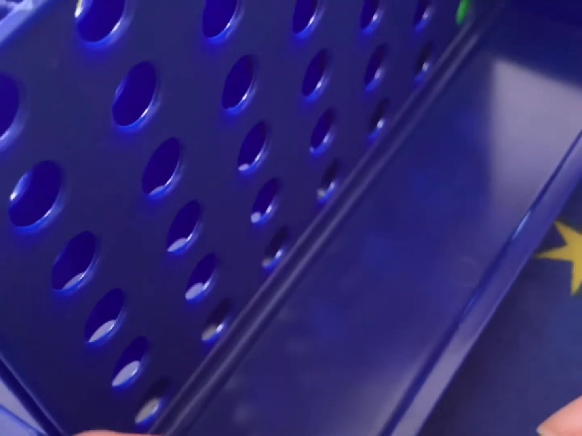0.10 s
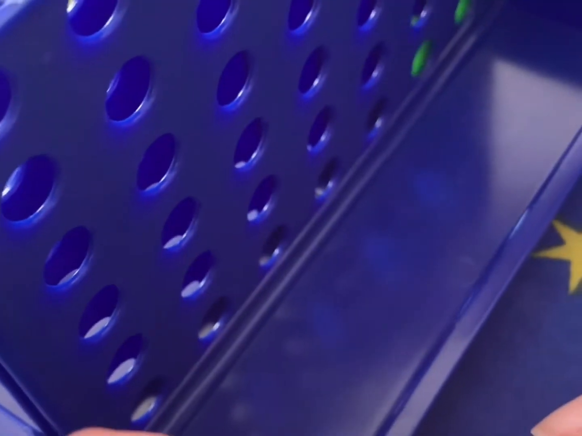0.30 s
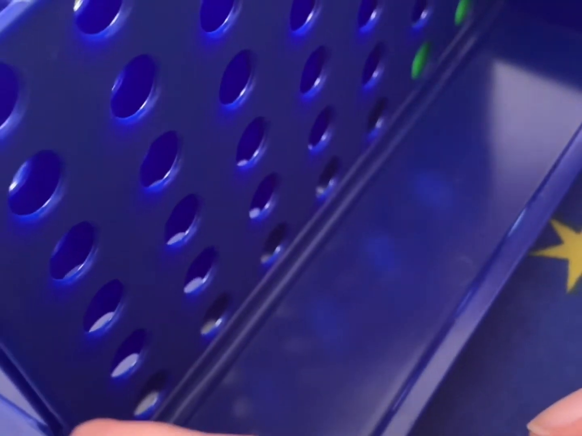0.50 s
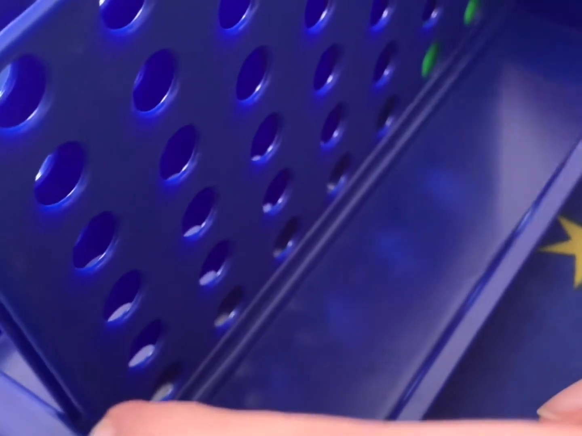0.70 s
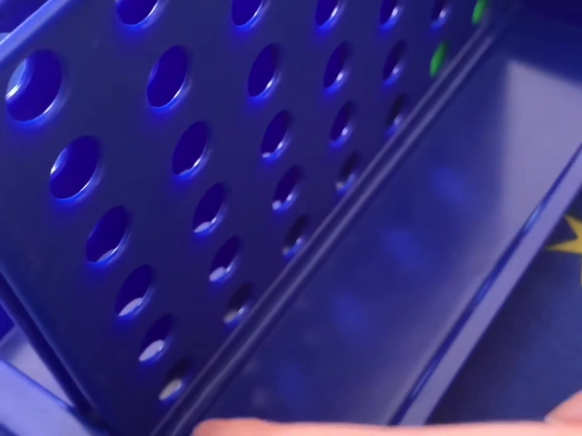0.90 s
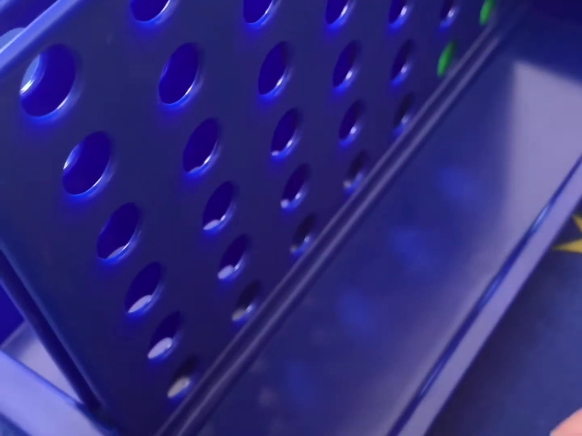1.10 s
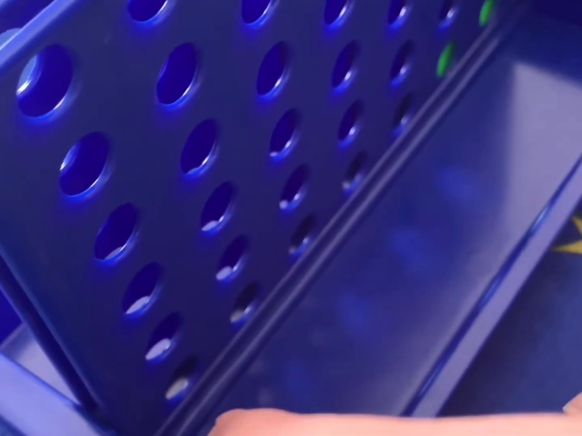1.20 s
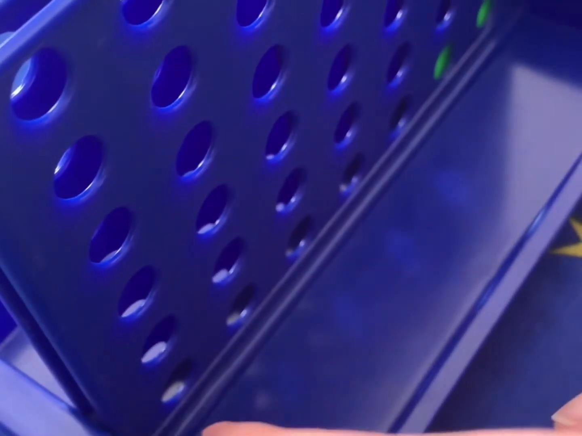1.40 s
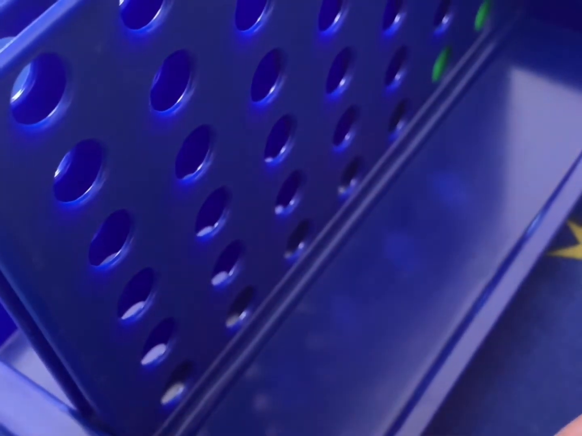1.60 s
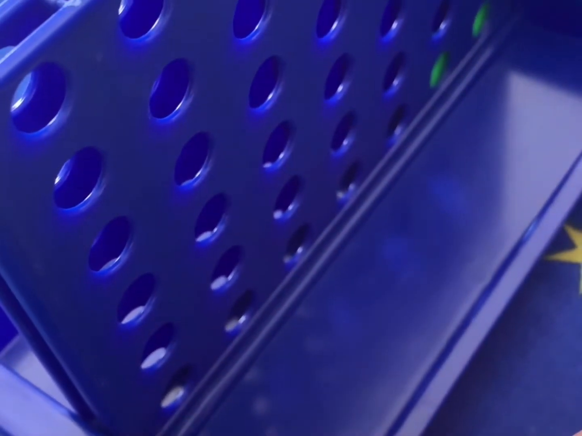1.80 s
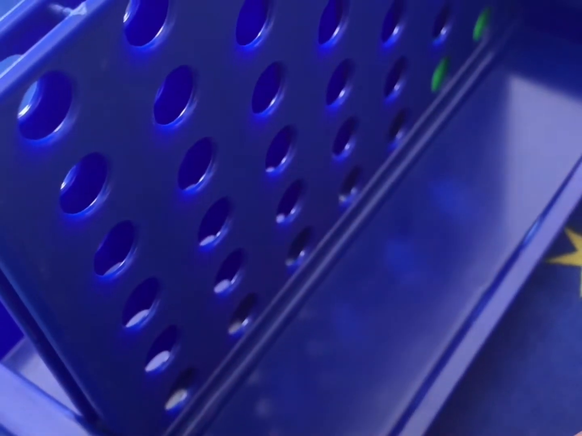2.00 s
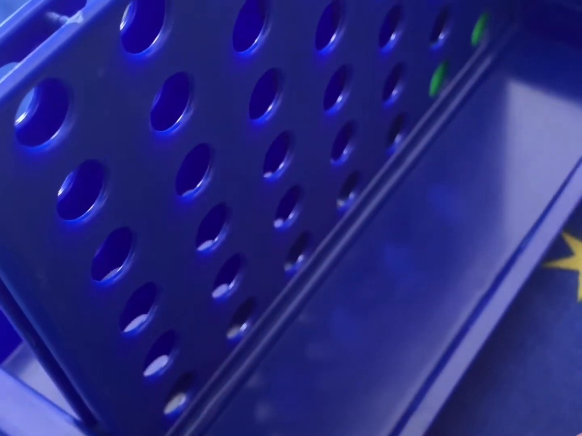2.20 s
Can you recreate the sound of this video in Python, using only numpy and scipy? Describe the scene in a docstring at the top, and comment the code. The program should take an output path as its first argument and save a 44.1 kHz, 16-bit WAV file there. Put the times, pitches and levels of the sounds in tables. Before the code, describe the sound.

Plastic game disc drops into an upright grid with sharp bouncing clacks, then loose discs tick lightly.

```python
"""A plastic disc rattles down a slot of an upright plastic grid, lands and bounces; later fingers shift loose
discs, which tick and ping thinly over a quiet rumbling room. Contacts are noise bursts and decaying modes, rubbing
is resonant noise, knocks and bumps are damped low notes, a faint squeak is a sagging tone, and the room is shaped
noise. The recorder's processing shifts phase between the channels, the right lagging further towards the treble."""
import sys
import numpy as np
from scipy import signal
from scipy.fft import rfft, irfft, next_fast_len
from scipy.io import wavfile
from scipy.ndimage import map_coordinates

SR = 44100
rng = np.random.default_rng(int(sys.argv[2]) if len(sys.argv) > 2 else 0)


def materialize(psi):
    """Save the field psi as 16-bit PCM at rate SR to the path in sys.argv[1].

    A 1-D psi becomes a single channel; in a 2-D psi each row is a channel.
    """
    bounded = np.clip(np.atleast_2d(psi).T, -1, 1)
    quanta = np.round(bounded * 32767).astype(np.int16)
    wavfile.write(sys.argv[1], SR, quanta)


def gain_from_db(level_db):
    """Turn a decibel level (scalar or array-like) into a linear amplitude factor."""
    decades = np.asarray(level_db, float) / 20
    return 10 ** decades


N = 97020  # samples, 2.2 s

# vibration modes of the plastic grid: mode_hz, relative_level_db, nominal_t60_s
GRID_MODES = [(1758, -6, 0.085), (1887, -5, 0.075), (2445, -12, .08), (2600, -3, 0.065), (2945, -6, 0.07),
              (3420, -10, 0.075), (3797, -4, 0.055), (5740, -7, .04), (5960, 0, 0.035), (6090, 0, .04),
              (6743, -9, 0.05)]
# vibration modes of the disc: mode_hz, relative_level_db, nominal_t60_s
DISC_MODES = [(1690, -17, .05), (3545, -6, .05), (7140, -4, .035), (7330, -13, .03), (8200, -5, .012),
              (9600, -9, .012), (10400, -10, .015)]
CONTACT_LOW_HZ = 912  # bass corner of the contact sounds


def unit(x):
    """Power normalisation: scaled to rms 1."""
    return x / np.sqrt(np.mean(x ** 2) + 1e-20)


def along(points, hz):
    """Spectral interpolation: (Hz, value) points read on a log frequency axis."""
    f, v = np.transpose(points)
    return np.interp(np.log(hz + 1), np.log(f + 1), v)


def level(rows):
    """Amplitude envelope: gain per sample from (s, dB) rows, all but silent outside them."""
    s, db = np.transpose(rows)
    return gain_from_db(np.interp(np.arange(N) / SR, s, db, left=-150, right=-150))


def wobble(rate):
    """Slow random modulation: a smooth curve through rate random knots a second."""
    knots = rng.standard_normal(int(N * rate / SR) + 4)
    return map_coordinates(knots, [np.arange(N) * rate / SR])


def filtered(x, response):
    """Linear filtering: the spectrum of x times a complex response of frequency."""
    n = x.shape[-1]
    m = next_fast_len(n + 8192)
    return irfft(rfft(x, m) * response(np.fft.rfftfreq(m, 1 / SR)), m)[..., :n]


def highpass(x, corner_hz):
    """Two equal first-order high-pass stages: 12 dB per octave well below the corner."""
    return filtered(x, lambda hz: (1j * hz / (corner_hz + 1j * hz)) ** 2)


def noise(colour, size):
    """Spectral shaping: coloured noise of rms 1."""
    white = rng.standard_normal(size)
    return unit(filtered(white, lambda hz: gain_from_db(along(colour, hz))))


def dying(t, t60, rise=.00013):
    """Damped free vibration: a quick rise (s), then an exponential fall of 60 dB in t60."""
    return gain_from_db(-60 * t / max(t60, .001)) * (1 - np.exp(-t / rise))


def tone(hz, t, t60):
    """Two-stage modal decay: a rough sine falls fast at first, then lingers; phase and level are random."""
    wander = .024 * np.cumsum(rng.standard_normal(len(t)))  # radians
    fade = dying(t, t60 * .3) + gain_from_db(-8) * dying(t, t60)
    scatter = gain_from_db(1.5 * rng.standard_normal())
    return scatter * fade * np.sin(2 * np.pi * (hz * t + rng.random()) + wander)


def burst(envelope, colour, tilt_db):
    """Impact noise: enveloped, then coloured and tilted towards the bass, with the envelope's energy."""
    raw = np.pad(envelope * rng.standard_normal(len(envelope)), (16, 0))
    x = filtered(raw, lambda hz: gain_from_db(along(colour, hz) - tilt_db * np.log2(hz + 300)))
    return (x * np.linalg.norm(envelope) / np.linalg.norm(x))[16:]


def add_at(out, start_s, sound):
    """Superposition: adds a sound to out from its start time."""
    out[round(start_s * SR):][:len(sound)] += sound


def rumble():
    """Low-frequency noise: a lumpy rumble common to both channels, with a weak opposed part."""
    # rumble envelope: time_s, level_db
    rumble_level = [(0.0, -47), (0.1, -55.5), (0.43, -54.5), (0.45, -47.5), (0.48, -51.5), (0.59, -51.5),
                    (0.72, -55.5), (0.94, -52.5), (0.96, -41), (1.01, -57.5), (1.07, -53), (1.11, -49),
                    (1.35, -57.5), (1.55, -53), (1.89, -59), (1.93, -50), (1.97, -62), (2.2, -57)]
    # rumble spectrum: frequency_hz, relative_density_db (per Hz)
    rumble_colour = [(11, -32.5), (18, -1), (97, -10), (114, -5.5), (125, -19.5), (227, -20), (253, -21),
                     (350, -29.5), (460, -58.5), (770, -120)]
    envelope = level(rumble_level)
    mid = envelope * gain_from_db(1.5 * wobble(12)) * noise(rumble_colour, N)
    side = gain_from_db(-28) * envelope * noise(rumble_colour, N)
    return np.array([mid + side, mid - side])


def room_tone():
    """Diffuse-field coherence: wavering noise, alike left and right in the bass, unrelated in the treble."""
    # room tone spectrum: frequency_hz, relative_level_db
    air_colour = [(120, -120), (200, 3.5), (330, -8.5), (600, -11), (800, -12), (1100, -6.5), (1700, -19.5),
                  (2500, -28), (4000, -36), (9000, -34), (14000, -42), (16000, -43.5), (17000, -120)]
    # coherence of the channels: frequency_hz, left_right_likeness (0 to 1)
    air_alike = [(200, .9), (330, .6), (650, 0)]
    # room tone envelope: time_s, level_db
    air_level = [(0, -62), (.15, -62), (.5, -64.5), (1.1, -63), (1.5, -67.5), (2.2, -67)]

    def mid_side(hz):
        angle = np.arccos(np.clip(along(air_alike, hz), 0, 1)) / 2
        return np.array([np.cos(angle), np.sin(angle)])

    shared = filtered(noise(air_colour, (2, N)), mid_side)
    mid, side = shared * level(air_level) * gain_from_db(1.4 * wobble(3.2))
    return np.array([mid + side, mid - side])


def low_note(hz, t60):
    """Damped oscillation: a low sine with a soft start and an exponential fall."""
    t = np.arange(SR // 5) / SR
    rise_s = .0011
    return gain_from_db(-60 * t / t60) * (1 - np.exp(-t / rise_s)) * np.sin(2 * np.pi * hz * t)


def knocks():
    """Cavity resonance: the slot's hollow knock is a low note with an overtone near the octave."""
    # hollow knocks: start_s, level_db, pitch_hz, t60_s
    knock_events = [(0, -60, 511, 0.17), (0.443, -53.5, 450, 0.072), (0.501, -57, 468, 0.069),
                    (1.045, -51, 564, 0.033), (0.2326, -35.5, 440.3, 0.077), (0.2463, -27.5, 449.5, 0.06),
                    (0.3129, -29, 555, 0.055), (0.3443, -27.5, 544.4, 0.038), (.36, -33, 532, 0.06)]
    out = np.zeros(N + SR)
    for start_s, db, hz, t60 in knock_events:
        note = low_note(hz, t60) + gain_from_db(-4) * low_note(2.02 * hz, t60)
        add_at(out, start_s, gain_from_db(db) * note)
    return out[:N]


def slide():
    """Resonant friction: lumpy rubbing noise through the disc's modes as it falls, the grid's too on landing."""
    # rubbing in the slot, one list falling and one landing: time_s, level_db (before the overall gain)
    slide_levels = [
        [(0, -45.5), (.03, -68), (.045, -58.5), (.07, -77), (.095, -52), (.13, -51), (.15, -62), (.2, -55.5),
         (.215, -49)],
        [(.216, -49.5), (.233, -29.5), (.242, -36), (.252, -28), (.3, -42), (.34, -46), (.38, -47),
         (.39, -61.5), (.45, -64.5)],
    ]
    width = .09  # resonance bandwidth as a share of its frequency

    def body(f, modes):
        response = 0
        for k, (centre, db, _) in enumerate(modes):
            band = 1j * f * centre * width
            # neighbouring modes have opposite signs
            response = response + (-1) ** k * gain_from_db(db) * band / (centre ** 2 - f ** 2 + band)
        return response

    out = 0
    for rows, modes in zip(slide_levels, (DISC_MODES, sorted(DISC_MODES + GRID_MODES))):
        rub = rng.standard_normal(N) * gain_from_db(2.5 * wobble(460))
        out = out + level(rows) * unit(filtered(rub, lambda f: body(f, modes)))
    return gain_from_db(-5.5) * out


def clacks():
    """Modal impact: each contact cracks, rings disc and grid and buzzes; weight favours the lower modes."""
    # disc against grid: start_s, relative_level_db, weight_db_per_octave (towards the bass),
    # ring_share (of the modes' t60), grid_level_db (over the disc's)
    clack_events = [(0.0975, -38, 3.5, 2.7, -12.5), (.107, -21, -2, 2.5, -18),
                    (.119, -24, -3.5, 1.7, -13.5), (0.1599, -25.5, -9.5, 1.65, -16.5),
                    (0.1841, -27, -11, 1.04, -20.5), (0.195, -46.5, -6.5, 4.5, -8.5),
                    (0.2162, -20, -3.5, 0.22, -10), (0.2204, -20.5, 1.5, 2.4, -8.5),
                    (0.224, -25.5, 3.5, 1.7, -2), (0.2282, -23.5, 0.5, 2.8, 2),
                    (0.2303, -15.5, 0.5, 1.37, 0), (0.2332, -1, 1.5, 0.29, -12), (0.245, -14.5, 7, 2, -6),
                    (0.2479, -16, 3.5, 3.1, -7), (0.2534, -18.5, 4, 0.7, -9),
                    (0.2602, -23.5, -1.5, 1.7, -5.5), (0.2726, -23.5, -6.5, 2.1, -5),
                    (0.288, -23, -1.5, 4.3, -10), (0.3122, -3, -0.5, 1.15, -2.5), (.344, -5, 2.5, 1.06, -1),
                    (0.3596, -15.5, 4.5, 0.38, -0.5), (0.3607, -19.5, 2, 0.68, 0),
                    (0.3645, -22.5, 1, 1.8, 3), (0.373, -27, -1, 0.51, -0.5), (0.378, -31.5, 2, 0.72, 6.5),
                    (0.3821, -36, 2, 0.33, 2), (0.4754, -48, -15.5, 0.82, -15),
                    (0.4778, -36.5, -0.5, 2.5, -7.5)]
    # contact noise spectrum before tilting: frequency_hz, relative_level_db
    crack_colour = [(250, -120), (500, -8.5), (1400, -16.5), (2200, -13), (3300, -7.5), (6000, -5.5),
                    (6400, -12.5), (7200, -6), (8500, -1), (10000, -11), (11500, -13), (14500, -17.5),
                    (16000, -19.5), (17000, -120)]
    ring_db, crack_db, buzz_db = -11.5, 1, -27.5
    crack_t60, crack_rise_s, buzz_t60 = .011, .0012, .088  # s; the buzz is also scaled by ring_share
    # the settled disc stills earlier contacts: when (s), speed of the fall (s per 60 dB), its floor (dB)
    rest_s, rest_t60, rest_db = .386, .029, -22

    out, t = np.zeros(N + SR), np.arange(SR // 5) / SR
    for start_s, db, weight, share, grid_db in clack_events:
        modes = DISC_MODES + [(hz, mode_db + grid_db, t60) for hz, mode_db, t60 in GRID_MODES]
        ring = 0
        for hz, mode_db, t60 in modes:
            tilt_db = weight * np.log2(4000 / (hz + 300))
            ring = ring + gain_from_db(mode_db + tilt_db) * tone(hz, t, t60 * share)
        crack = burst(dying(t, crack_t60, crack_rise_s), crack_colour, weight)
        # the unpitched buzz is 4 dB per octave duller than the crack
        buzz = burst(dying(t, buzz_t60 * share), crack_colour, weight + 4)
        contact = gain_from_db(ring_db) * ring + gain_from_db(crack_db) * crack + gain_from_db(buzz_db) * buzz
        since_rest = np.clip(start_s + t - rest_s, 0, None)
        stilled_db = np.maximum(-60 * since_rest / rest_t60, rest_db) * (start_s < rest_s)
        add_at(out, start_s, gain_from_db(db + stilled_db) * contact)
    return highpass(out[:N], CONTACT_LOW_HZ)


def bumps():
    """Structure-borne sound: soft bumps through the table are single damped low notes."""
    # table bumps: start_s, level_db, pitch_hz, t60_s
    bump_events = [(.44, -56, 69, 0.08), (0.961, -36, 72.6, 0.1), (1.1, -43, 100.3, 0.11),
                   (2.099, -42, 179, 0.0358), (2.166, -39, 164, 0.019)]
    out = np.zeros(N + SR)
    for start_s, db, hz, t60 in bump_events:
        add_at(out, start_s, gain_from_db(db) * low_note(hz, t60))
    return out[:N]


def ticks():
    """Light impact: loose discs give a tiny bright snap, a fizz and a high ping of close beating modes."""
    # loose discs touching: start_s, relative_level_db, ping_db (relative), fizz_t60_s,
    # weight_db_per_octave (of snap and fizz, towards the bass)
    tick_events = [(0.516, -25, 8, 0.042, 3), (0.5228, -26, -22, 0.018, 3.5), (0.7744, -59, -20, 0.025, 8),
                   (0.7829, -49, -21.5, 0.028, 3.5), (0.858, -41.5, -25, 0.017, 5.5),
                   (.861, -39, -16, 0.029, 15), (0.9411, -25, -18, 0.027, 4),
                   (0.9433, -19.5, -13, 0.0088, -15), (0.945, -24, -13.5, 0.011, 0.5),
                   (0.9481, -24.5, -24, 0.027, 0.5), (0.9523, -33, -8, 0.016, 4),
                   (0.955, -28, -8, 0.076, 2), (.973, -38, -24, 0.1, 8), (0.982, -23, -7, 0.0082, 1),
                   (.988, -23.5, -20, .015, 1), (0.993, -35, -8, 0.014, 10), (1.0002, -35, -9, 0.063, 4),
                   (1.014, -39.5, -29, 0.086, 9), (1.0402, -29, -5, 0.018, 6),
                   (1.0395, -26, -3, 0.0094, -7), (1.0429, -28, 8, .02, 3),
                   (1.046, -23.5, -4.5, 0.023, -15), (1.0476, -21.5, 2, 0.026, 0.5),
                   (1.0518, -23, -13, 0.04, -10), (1.061, -42, -10, 0.044, 10),
                   (1.0637, -32, -18, 0.056, -7), (1.069, -38.5, -15, 0.047, 8),
                   (1.085, -29, 2, 0.05, -12.5), (1.0895, -36.5, 7.5, 0.03, 3),
                   (1.1671, -49, -16, 0.017, 8), (1.416, -55, -19, 0.032, 3), (1.3719, -50, -24, 0.036, 9),
                   (1.4276, -49.5, -26, 0.055, 6), (1.4738, -35, -18, 0.015, -5.5),
                   (1.4766, -35.5, -8, .025, -4), (1.5, -54, -12, 0.017, -7),
                   (2.082, -50.5, -20, 0.056, 10), (2.1063, -32.5, -16, .02, -3),
                   (2.1123, -38.5, -12, 0.096, 5.5), (2.1155, -37, -18, .015, -17),
                   (2.124, -28.5, -32, 0.023, -12.5), (2.1424, -31, -21, 0.03, 6.5),
                   (2.1473, -38, -23, 0.024, 8), (2.151, -44, -22, 0.022, 7), (2.155, -39, -22, 0.019, 12),
                   (2.1647, -27, 1, 0.052, 6.5), (2.166, -25.5, -7, .04, -5), (2.1715, -41, 6, 0.027, 5),
                   (2.178, -34, -16, 0.024, -1), (2.1838, -30, -8, 0.03, 3.5), (2.199, -44, -15, .03, 8)]
    # snap and fizz spectrum before tilting: frequency_hz, relative_level_db
    tick_colour = [(700, -120), (1500, -18), (3500, -14.5), (5500, -0.5), (8500, -2.5), (11500, 1.5),
                   (14000, -15), (15500, -18), (17000, -120)]
    # high modes of a loose disc: mode_hz, relative_level_db
    ping_modes = [(13350, 4), (13700, 1), (13900, -16), (14300, -19)]
    snap_db, fizz_db, all_pings_db = 1, -19, -5.5
    snap_t60, ping_t60 = .002, .022  # s

    out, t = np.zeros(N + SR), np.arange(SR // 10) / SR
    for start_s, db, ping_db, fizz_t60, weight in tick_events:
        snap = burst(gain_from_db(-60 * t / snap_t60) * (t > .0002), tick_colour, weight)
        fizz = burst(dying(t, fizz_t60), tick_colour, weight)
        ping = sum(gain_from_db(ping_db + mode_db) * tone(hz, t, ping_t60) for hz, mode_db in ping_modes)
        contact = gain_from_db(snap_db) * snap + gain_from_db(fizz_db) * fizz + gain_from_db(all_pings_db) * ping
        add_at(out, start_s, gain_from_db(db) * contact)
    return highpass(out[:N], CONTACT_LOW_HZ)


def rustle():
    """Friction noise: a faint rustle of hands as coloured noise with a quick random flutter."""
    # rustle envelope: time_s, level_db (before the overall gain)
    rustle_level = [(0.53, -83.5), (0.756, -72.5), (0.892, -94), (1.058, -99.5), (1.294, -81.5),
                    (1.422, -76), (1.64, -114), (1.91, -96), (2.1, -85.5)]
    # rustle spectrum: frequency_hz, relative_level_db
    rustle_colour = [(1500, -120), (2500, 1.5), (3500, -5), (6000, 4), (9000, -16.5), (12000, -1),
                     (14500, -9.5), (16500, -120)]
    return gain_from_db(1.5 + 3.55 * wobble(61.5)) * level(rustle_level) * noise(rustle_colour, N)


def squeak():
    """Frequency modulation: a thin wavering tone sags in pitch, its octave sounding in the early part."""
    start_s, length_s, pitch_hz, sag_hz = 1.835, .085, 4480, 190
    progress = ((np.arange(N) / SR - start_s) / length_s).clip(0, 1)
    phase = 2 * np.pi * np.cumsum(pitch_hz - sag_hz * progress + 40 * wobble(220)) / SR
    swell = gain_from_db(-72.5 + 3.4 * wobble(120)) * np.sin(np.pi * progress) ** .5
    return swell * (np.sin(phase) + np.sin(2 * phase) * (progress < .4))


def room(x):
    """Reverberation: convolution with stereo noise whose frequencies each die at their own speed."""
    # reverberation time: frequency_hz, t60_s
    room_t60 = [(400, 0.19), (3000, 0.13), (12000, 0.04)]
    hz, t, z = signal.stft(rng.standard_normal((2, SR // 2)), SR, nperseg=256)
    decay = gain_from_db(-60 * t / along(room_t60, hz)[:, None])
    tail = signal.istft(z * decay, SR, nperseg=256)[1]
    tail = tail / np.linalg.norm(tail[0])
    delayed = np.pad(highpass(x, 130), (300, 0))  # samples before the tail
    return signal.fftconvolve(delayed[None], tail, axes=1)[:, :N]


def scene():
    """Superposition: direct sounds, their reverberation and the background."""
    discs = knocks() + slide() + clacks() + bumps() + ticks() + squeak()
    return discs + gain_from_db(-16.5) * room(discs) + rumble() + room_tone() + rustle()


def roll_off(x):
    """The treble ends steeply here."""
    return signal.sosfilt(signal.butter(12, 16980, fs=SR, output="sos"), x)


def record(dry):
    """Inter-channel phase difference: the recorder gives it, with a small level difference and a cut top."""
    # phase between the channels: frequency_hz, left_lead_rad
    channel_lead = [(0, 0), (1640, 0.2), (3100, 1.8), (3450, 1.3), (5340, 3.7), (6370, 6.0), (7490, 6.5),
                    (7750, 7.7), (9560, 10.0), (10700, 12.3), (11700, 13.1), (12700, 15.0), (14800, 18.5),
                    (16500, 19.1)]
    # level between the channels: frequency_hz, left_over_right_db
    channel_balance = [(100, 0), (200, -1.5), (1200, -1.5), (3000, 0), (10000, .5)]
    f, lead = np.transpose(channel_lead)

    def channels(hz):
        # half the difference goes to each channel, in opposite directions
        half = np.exp(.5j * np.interp(hz, f, lead)) * gain_from_db(along(channel_balance, hz) / 2)
        return np.array([half, 1 / half]) / (1 + (hz / 16200) ** 60)

    mix = filtered(dry, channels)
    return roll_off(mix)


dry = scene()
out = record(dry)
materialize(out)
```